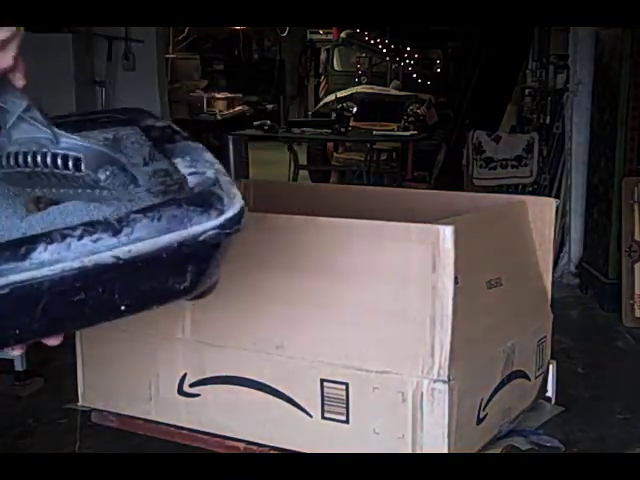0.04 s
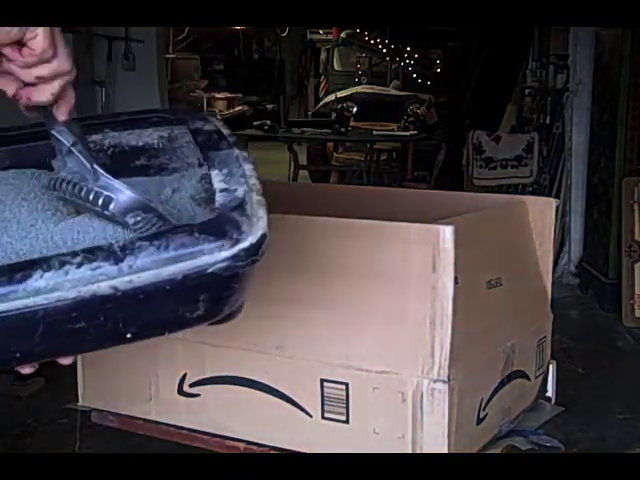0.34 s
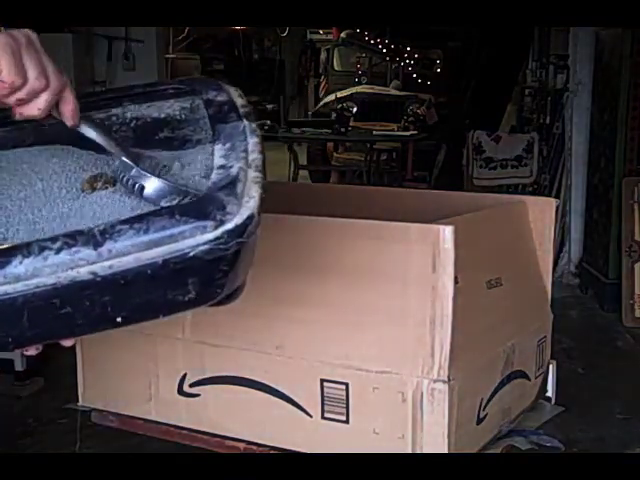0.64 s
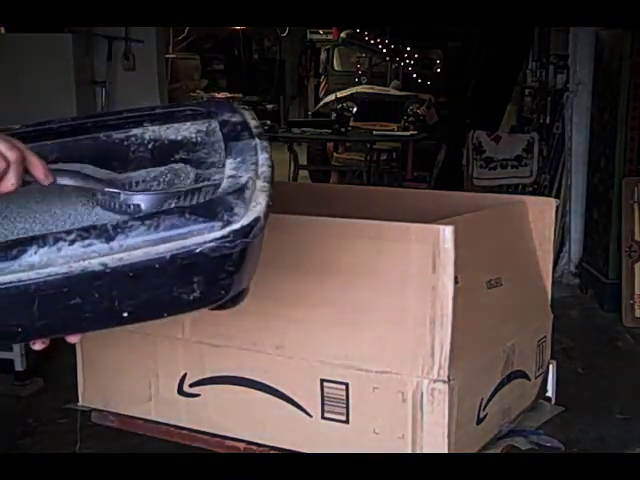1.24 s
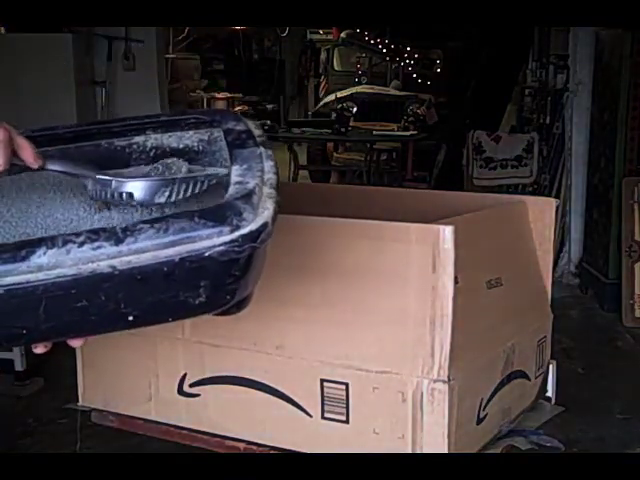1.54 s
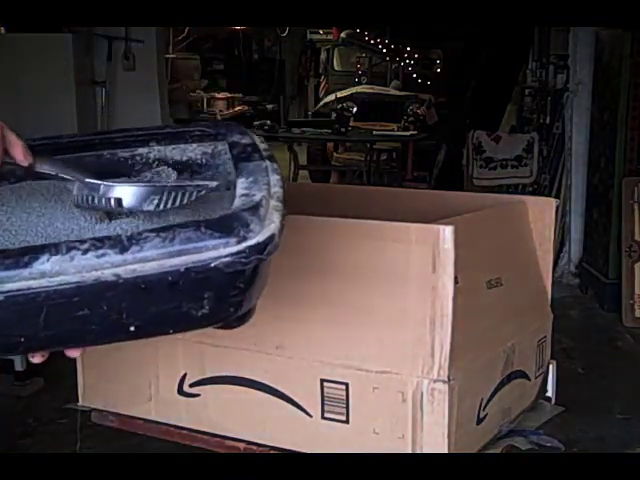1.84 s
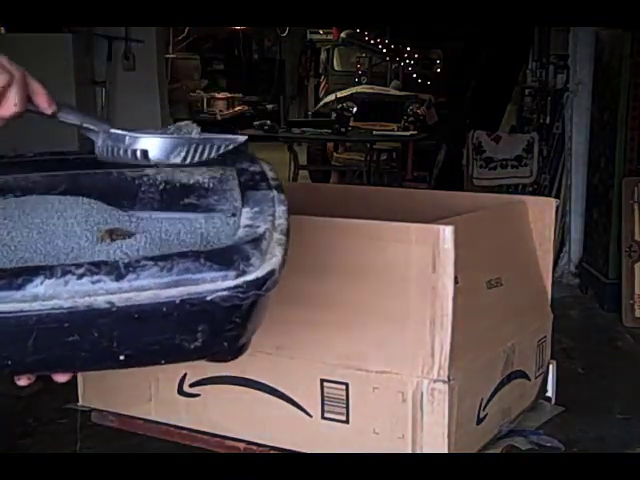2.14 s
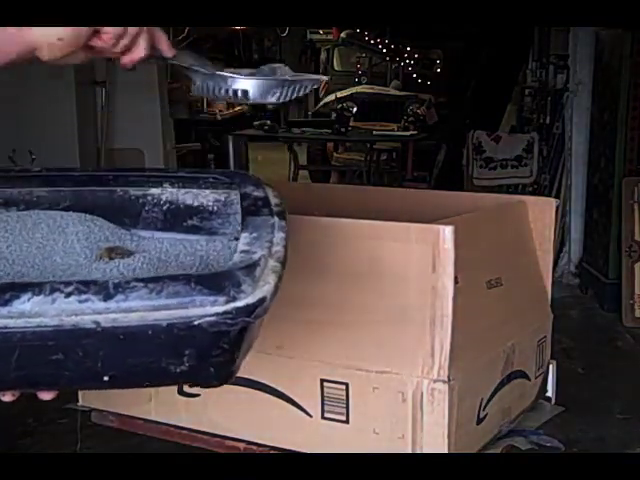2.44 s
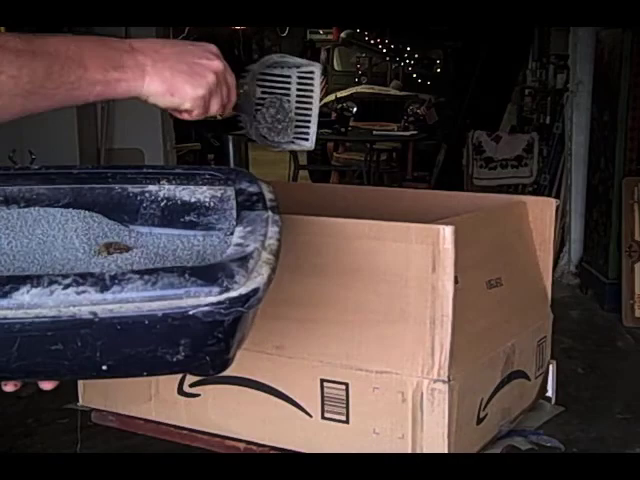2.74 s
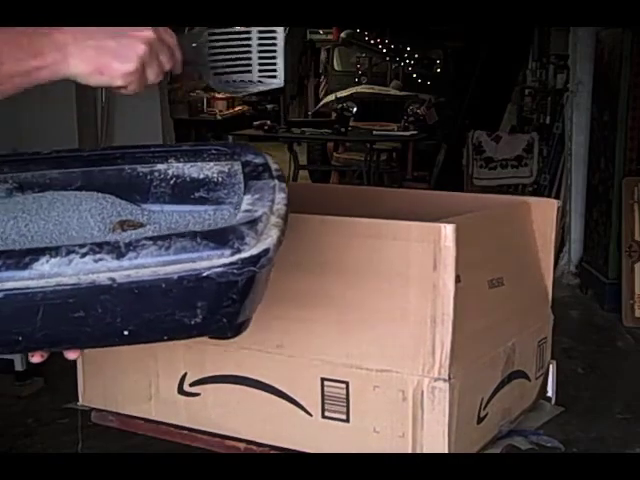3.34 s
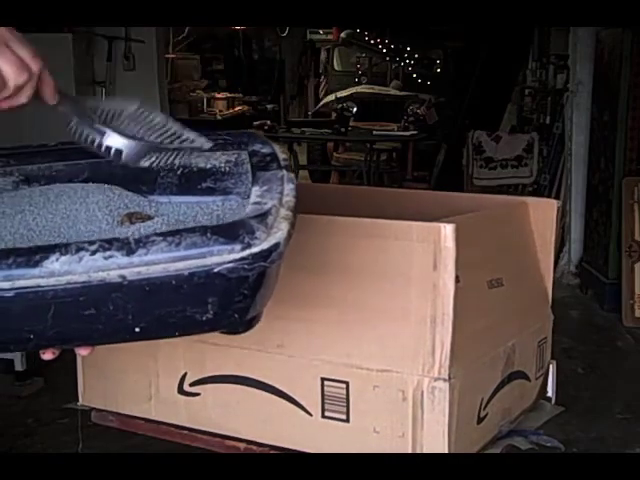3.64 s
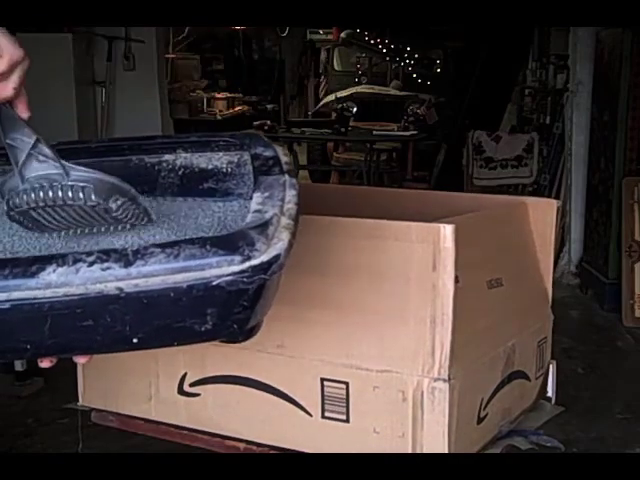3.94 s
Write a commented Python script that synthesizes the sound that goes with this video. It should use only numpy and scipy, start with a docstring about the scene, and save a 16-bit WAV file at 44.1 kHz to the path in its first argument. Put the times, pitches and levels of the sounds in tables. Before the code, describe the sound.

A slotted metal scoop bites into litter at 0.2 seconds and sifts softly until about 2, knocking on a plastic tray near 0.6 and 1.6 with faint squeaks. From 2.5, stray granules tick increasingly loudly. At 3.2 the load hits a cardboard box with a hard clack, crash and low boom; a thinning shower and tumbling clumps fade by 4. The microphone is close, over faint workshop hum.

```python
"""A workshop with a faint hum, one microphone close to a plastic tray of litter and a big cardboard box.
A slotted metal scoop bites into the granules, knocks against the tray, squeaks and sifts its load.
Stray granules tick, louder as the scoop is tipped over the box. Just after three seconds come a hard
clack, the crash of the load and the box's low boom; a thinning shower drums on the cardboard
and a few clumps tumble."""
import sys
import numpy as np
from scipy import signal
from scipy.fft import rfft, irfft
from scipy.io import wavfile
from scipy.ndimage import uniform_filter1d

SR = 44100
rng = np.random.default_rng(int(sys.argv[2]) if len(sys.argv) > 2 else 0)


def persist_wave(psi):
    """Save psi, clipped to +-1, as 16-bit WAV."""
    counts = np.round(np.clip(psi, -1, 1) * 32767).astype(np.int16)
    wavfile.write(sys.argv[1], SR, np.atleast_2d(counts).T)


N = 176400
T = np.arange(N) / SR
CRASH_S = 3.187
FLOW_REF_DB = -45  # the flow level at which the grain rates are given


def from_db(db):
    """Decibels to gain."""
    return 10 ** (np.asarray(db) / 20)


def rms_one(x):
    """Scale to unit power."""
    return x / np.sqrt(np.mean(x ** 2) + 1e-20)


def colour(x, points):
    """Causal filter of unit power gain through (Hz, dB) points; the bass falls away below the first."""
    size = 8192
    hz = np.fft.rfftfreq(size, 1 / SR)
    point_hz, point_db = np.transpose(points)
    db = np.interp(np.log(np.maximum(hz, 1)), np.log(point_hz), point_db)
    gain = rms_one(from_db(db) * np.clip(hz / point_hz[0], .1, 1) ** 2)
    cepstrum = irfft(np.log(gain))
    cepstrum[1:size // 2] *= 2  # fold to minimum phase
    cepstrum[size // 2 + 1:] = 0
    return signal.fftconvolve(x, irfft(np.exp(rfft(cepstrum))))[:len(x)]


def butter(x, hz, kind, order=2):
    """Plain low-, high- or band-pass."""
    sos = signal.butter(order, np.clip(hz, 10, SR / 2 - 1000), kind, fs=SR, output="sos")
    return signal.sosfilt(sos, x)


def add(out, start_s, x):
    """Mix a short sound in at a time."""
    i = int(start_s * SR)
    out[i:i + len(x)] += x[:N - i]


def burst(t60_s, snap=2.3):
    """A contact: one spike of height snap, then a dense ring that dies."""
    t = T[:SR // 4]
    x = rng.standard_normal(len(t)) * from_db(-60 * np.minimum(t / t60_s, 2))
    x[:2] = -snap
    return x


def swell(start_s, rise_s, hold_s, t60_s):
    """Noise of countless contacts with a linear rise, a hold and an exponential fall."""
    fall = from_db(-60 * np.clip((T - start_s - rise_s - hold_s) / t60_s, 0, 3))
    return rng.standard_normal(N) * np.clip((T - start_s) / rise_s, 0, 1) * fall


def workshop_hum():
    """The steady, bass-heavy noise of the room."""
    # Each row: frequency in Hz, relative level in dB.
    spectrum = [(25, 2.5), (70, -4.5), (700, -1.5), (2000, -7.5), (4000, -17), (9000, -28.5)]
    return from_db(-49.5) * colour(rng.standard_normal(N), spectrum)


def grains(flow, per_s, spread_db, clump_db):
    """Random grain impacts in little avalanches; more flow brings more and stronger ones."""
    db = np.interp(T, *np.transpose(flow), left=-120)
    chance = np.clip(per_s * from_db(.5 * (db - FLOW_REF_DB)) / SR, 1e-4, 1)
    size_db = spread_db * np.minimum(rng.exponential(1, N), 5)
    sizes = rms_one(from_db(size_db) * rng.choice([-1, 1], N))
    surge = rms_one(uniform_filter1d(rng.standard_normal(N), size=150))
    avalanches = rms_one(from_db(clump_db * surge))
    hits = rng.random(N) < chance
    return hits / np.sqrt(chance) * sizes * avalanches * from_db(db)


def stream(flow, per_s, spread_db, stray_db, stray_t60_s=.0096):
    """A dense flow of granules, with stray ones that bounce and stand out as the flow thins."""
    stray_flow = [(s, .67 * (db - FLOW_REF_DB) + FLOW_REF_DB) for s, db in flow]
    strays = grains(stray_flow, per_s=100, spread_db=3, clump_db=0)
    decay = from_db(-120 / (stray_t60_s * SR))  # share of energy left after each sample
    energy = signal.lfilter([1 - decay], [1, -decay], strays ** 2 + 1e-18)
    rattle = rng.standard_normal(N) * np.sqrt(energy)
    return grains(flow, per_s, spread_db, clump_db=1.94) + from_db(stray_db) * rattle


def sifting():
    """Granules run over the metal of the scoop and through its slots."""
    # Each row: time in seconds, relative level of the flow in dB.
    flow = [(0, -48.5), (.13, -62.5), (.2, -64), (.215, -42), (.42, -43.5), (.49, -39), (.6, -37),
            (.67, -46.5), (.79, -42), (.94, -48.5), (1.2, -51.5), (1.38, -48.5), (1.48, -52), (1.54, -43),
            (1.65, -46.5), (1.77, -59.5), (1.9, -51.5), (1.935, -40), (1.98, -58), (2.15, -66), (2.37, -63),
            (2.42, -56.5), (2.5, -63)]
    # Each row: frequency in Hz, relative level in dB.
    spectrum = [(300, -11), (900, -10), (1800, -5), (2700, -3.5), (3300, 0), (4100, -3.5), (7000, -3.5),
                (15500, -12.5)]
    return from_db(1.57) * colour(stream(flow, per_s=12000, spread_db=2, stray_db=-10.5), spectrum)


def granule_ticks():
    """Single granules hit something hard: sharp, dry clicks with a faint room tail."""
    # Each row: start in seconds, relative level in dB, treble cutoff in Hz.
    ticks = [(.169, -30.5, 7500), (.776, -31, 12000), (1.663, -34, 14000), (1.7127, -37.5, 12000),
             (1.782, -42, 13000), (2.561, -34, 4500), (2.632, -40, 8000), (2.6518, -36.5, 6400),
             (2.7999, -20.5, 3500), (2.8687, -19, 12600), (2.885, -21.5, 12700), (2.9622, -12.5, 8000),
             (3.0598, -32.5, 10300), (3.109, -22.5, 13500), (3.1296, -17, 12200), (3.162, -12.5, 11000),
             (3.264, -14, 13000), (3.4547, -15, 5600), (3.595, -18, 5000), (3.7051, -23, 5770),
             (3.7548, -26.5, 8100), (3.806, -32, 14000)]
    # Each row: frequency in Hz, relative level in dB.
    spectrum = [(480, -16), (1150, -4.5), (1800, -5), (2350, 0.5), (4300, -0.5), (11000, -2.5), (15500, 0)]
    out = np.zeros(N)
    for start_s, db, cutoff_hz in ticks:
        click = burst(t60_s=.031 * from_db(.11 * (db + 26)))  # heavier granules rattle longer
        tail = from_db(-14.5) * burst(t60_s=.28, snap=0)
        add(out, start_s, from_db(db) * butter(click + tail, cutoff_hz, "low"))
    return colour(out, spectrum)


def blade_bite():
    """The blade bites into the litter and scrapes the tray."""
    # Each row: frequency in Hz, relative level in dB.
    spectrum = [(450, -12.5), (1700, -7), (2400, -5), (3300, -5), (3900, -12), (14000, -24)]
    return from_db(-24) * colour(swell(start_s=.199, rise_s=.024, hold_s=0, t60_s=.092), spectrum)


def tray_knocks(thud_hz=535):
    """The metal edge snaps on the tray; a thud and the plastic's modes follow, set by where it lands."""
    # Each row: start in seconds, relative level in dB, favoured pitch in Hz,
    # loss in dB per octave away from it, snap of the edge in dB over the level.
    knocks = [(0.6044, -23, 470, 4, 4), (1.016, -34, 700, 10, -12), (1.029, -34, 754, 12, -8),
              (1.06, -33, 870, 12, 0), (1.6284, -20.5, 695, 32, -6), (1.6546, -40, 520, 6, 1)]
    # Each row: frequency in Hz, relative level in dB, ring time (T60) in seconds.
    modes = [(316, -3, 0.11), (510, -3, 0.065), (696, 1, 0.046), (983, -2, 0.08), (1350, -7, 0.06),
             (2288, 2.5, 0.068)]
    out, t = np.zeros(N), T[:SR // 4]
    for start_s, db, pitch_hz, loss_per_octave, edge_db in knocks:
        edge = 2 * butter(burst(t60_s=.022), [1120, 3400], "band")
        add(out, start_s, from_db(db + edge_db) * edge)
        thud = 2 * butter(burst(t60_s=.097, snap=5.9), [thud_hz / 2, thud_hz * 2], "band")
        thud_db = db - 6 - loss_per_octave * abs(np.log2(thud_hz / pitch_hz))
        add(out, start_s, from_db(thud_db) * thud)
        for hz, mode_db, t60_s in modes:
            ring_db = db + mode_db - loss_per_octave * abs(np.log2(hz / pitch_hz))
            tone = np.sin(2 * np.pi * hz * t) * rng.choice([-1, 1])
            add(out, start_s, from_db(ring_db - 60 * t / t60_s) * tone)
    return butter(out, 220, "high")


def blade_squeaks(slip_s=.004, roughness_db=5):
    """The blade sticks and slips on the tray, ringing the scoop: a long scrape, then a narrow chirp."""
    # Each row: start in seconds, length in seconds, level in dB, pitch in Hz, pitch over bandwidth.
    squeaks = [(0.681, .24, -47, 2380, 7.7), (1.276, 0.017, -43, 2050, 30)]
    out, slip_times = np.zeros(N), np.arange(0, N / SR, slip_s)
    for start_s, length_s, db, hz, q in squeaks:
        slip_db = roughness_db * rng.standard_normal(N)[:len(slip_times)]
        force = np.interp(T, slip_times, from_db(slip_db))
        friction = force * butter(rng.standard_normal(N), [hz / np.sqrt(2), hz * np.sqrt(2)], "band")
        ring = signal.lfilter(*signal.iirpeak(hz, q, fs=SR), friction)[-int(length_s * SR):]
        arch = np.sin(np.linspace(0, np.pi, len(ring)))
        add(out, start_s, from_db(db) * rms_one(ring) * arch)
    return out


def shower(covering_db_per_s=10):
    """Granules rain into the box; from the crash on, the bare cardboard drums until litter covers it."""
    # Each row: time in seconds, relative level of the flow in dB.
    flow = [(3.09, -58), (3.125, -39.5), (3.16, -42), (3.165, -25.5), (3.203, -15), (3.24, -24.5),
            (3.36, -23.5), (3.48, -26), (3.6, -34.5), (3.75, -39.5), (3.86, -49.5), (4, -70.5)]
    # Each row of both: frequency in Hz, relative level in dB.
    granule_spectrum = [(650, -10.5), (1100, 1.5), (2300, 1), (8000, -2), (11000, -7), (13000, -4),
                        (15500, -13.5)]
    drum_spectrum = [(180, -6), (430, 0.5), (950, -1.5), (2200, -2), (10000, -29.5)]
    granules = stream(flow, per_s=2400, spread_db=3.5, stray_db=-2)
    bare = (T > CRASH_S) * from_db(-5.5 - covering_db_per_s * np.maximum(T - CRASH_S, 0))
    return colour(granules, granule_spectrum) + colour(granules * bare, drum_spectrum)


def clack_boom_and_clumps():
    """A hard clack, the box's low boom after the crash, and thuds of tumbling clumps: bands of noise."""
    # Each row: start in seconds, relative level in dB, pitch in Hz, decay time (T60) in seconds.
    hits = [(3.1706, -6.5, 2300, 0.023), (3.189, -7.5, 810, 0.046), (3.2, -26, 152, 0.28),
            (3.314, -14.5, 1120, 0.086), (3.424, -24.5, 584, 0.27), (3.532, -20, 540, 0.12),
            (3.6555, -16.5, 1060, 0.12), (3.768, -29, 990, 0.15), (3.885, -40.5, 570, 0.24)]
    out = np.zeros(N)
    for start_s, db, hz, t60_s in hits:
        hit = butter(burst(t60_s, snap=4.5), [hz / 1.61, hz * 1.75], "band")
        band_gain = np.sqrt(SR / 2 / hz) / 2  # keeps low, narrow bands as strong as wide ones
        add(out, start_s, from_db(db) * hit * band_gain)
    return out


def crash():
    """The bulk of the load hits the bottom of the box at once."""
    # Each row: frequency in Hz, relative level in dB.
    spectrum = [(70, -22), (125, 2), (650, -1), (2700, 1), (5000, -5.5), (15500, -12.5)]
    return from_db(-9.5) * colour(swell(CRASH_S, rise_s=.0045, hold_s=.015, t60_s=.046), spectrum)


def cardboard_box(impacts):
    """The panels and the air of the box add their resonances to whatever strikes it."""
    # Each row: frequency in Hz, bandwidth in Hz, relative gain in dB.
    resonances = [(141, 45, 1.5), (432, 32, 1.5), (690, 30, 1.5), (916, 107, 2), (2217, 71, -1),
                  (3350, 170, -5.5)]
    out = impacts.copy()
    for hz, width_hz, db in resonances:
        out += from_db(db) * signal.lfilter(*signal.iirpeak(hz, hz / width_hz, fs=SR), impacts)
    return out * from_db(-1)


def room_reflections(x, spots=4, spot_s=.02, t60_s=.36, delay_s=.0031):
    """Granules land in ever-changing spots, each with its own diffuse tail back to the microphone."""
    out, t = np.zeros(N), T[:SR // 2]
    for k in range(spots):
        away = abs((T / spot_s - k) % spots - spots / 2)
        share = np.cos(np.pi / 2 * np.minimum(away, 1))  # the spots fade in and out by turns
        tail = rng.standard_normal(len(t)) * from_db(-60 * t / t60_s)
        tail *= np.clip(t / delay_s - 1, 0, 1)
        out += signal.fftconvolve(x * share, tail / np.linalg.norm(tail))[:N]
    return out


def scene():
    """Tray and box close by in mono, the box with more of the room on it, over the workshop's hum."""
    at_tray = blade_bite() + blade_squeaks() + sifting() + tray_knocks()
    at_box = cardboard_box(crash() + shower() + clack_boom_and_clumps())
    room = room_reflections(from_db(-13) * at_tray + from_db(-8.5) * at_box)
    return (at_tray + at_box + granule_ticks() + room + workshop_hum())[None]


def record(dry):
    """The recorder rounds the peaks and cuts the treble above 15.8 kHz."""
    rounded = 1.2 * np.tanh(dry / 1.2)
    return signal.sosfilt(signal.ellip(10, .1, 80, 15800, fs=SR, output="sos"), rounded)


dry = scene()
out = record(dry)
persist_wave(out)
```